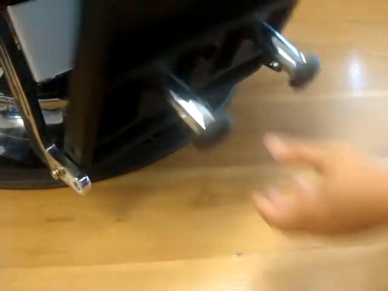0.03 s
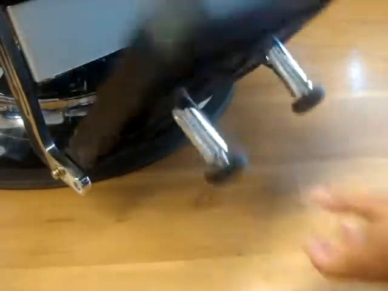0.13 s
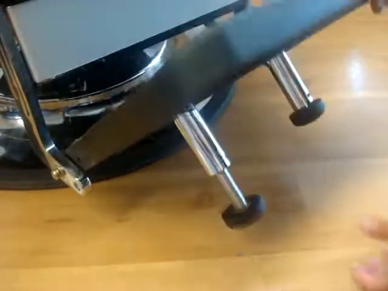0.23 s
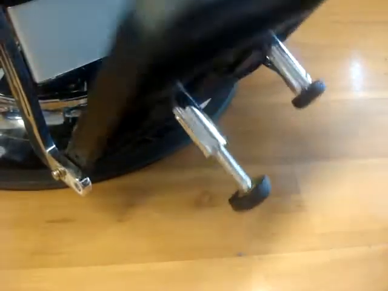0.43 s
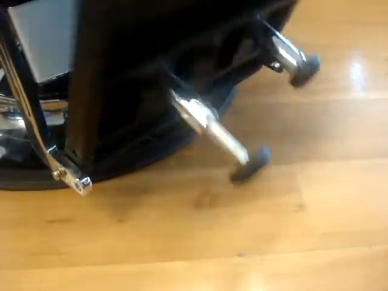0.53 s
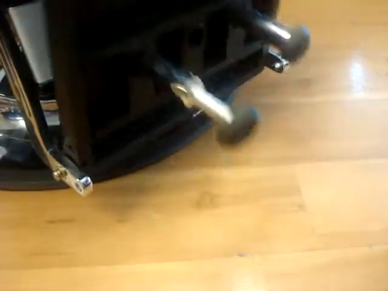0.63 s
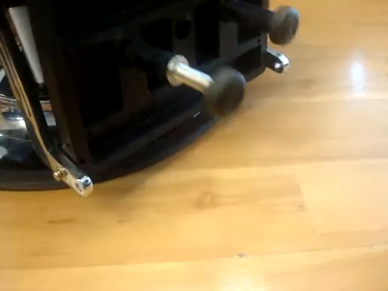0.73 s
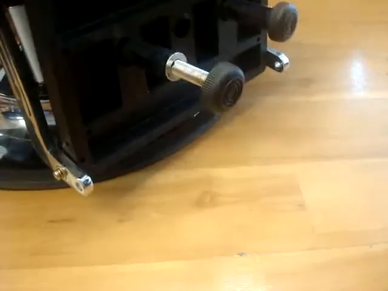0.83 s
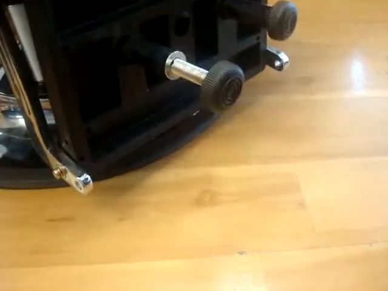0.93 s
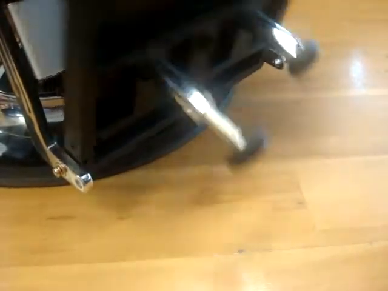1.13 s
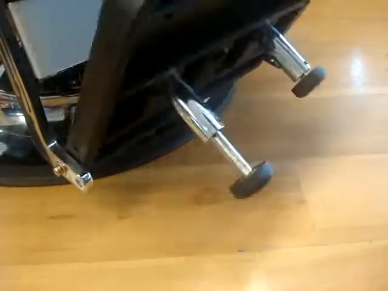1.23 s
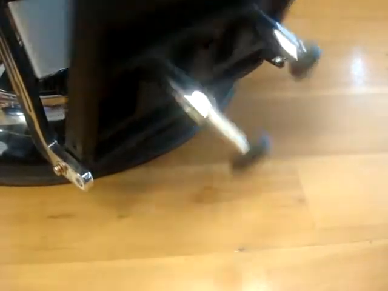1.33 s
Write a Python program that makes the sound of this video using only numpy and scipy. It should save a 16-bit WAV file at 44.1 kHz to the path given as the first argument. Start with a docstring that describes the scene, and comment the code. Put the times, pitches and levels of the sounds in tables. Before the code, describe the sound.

Loud clattering clank of a chair's metal footrest, followed by faint hinge knocks in a small room.

```python
"""A chair in a small room, on one microphone near enough to catch each contact ahead of the room.
Over a soft rush of air, the metal footrest is flipped: its hinge scrapes, and it chatters ever harder,
clanks against its stop with thuds through the chair's frame, and settles. A low hum swells and fades.
Then the loose hinge shifts with a few dull knocks, and two soft bumps follow as the footrest swings back."""
import sys
import numpy as np
from scipy import signal
from scipy.fft import rfft, irfft, next_fast_len
from scipy.io import wavfile

SR = 44100
rng = np.random.default_rng(int(sys.argv[2]) if len(sys.argv) > 2 else 0)


def output_pcm(signal):
    """Save a mono or channel-first signal as 16-bit PCM at the path in sys.argv[1].

    Samples are clipped to [-1, 1] before scaling.
    """
    pcm = np.clip(np.atleast_2d(signal).T, -1, 1) * 32767
    wavfile.write(sys.argv[1], SR, np.round(pcm).astype(np.int16))


N = 61739

# contacts of the chattering footrest: start_s, level_db, slope_db_per_octave
CONTACTS = [(0.1728, -33, -2.5), (0.186, -40.5, -3.5), (.200, -46, 8), (.215, -33, -0.5), (.228, -31.5, -4),
            (0.247, -27, 2.5), (0.2549, -25, 1), (.2625, -22.5, 2), (0.269, -19, 3.5), (0.2753, -22, 0.5),
            (0.286, -17.5, 2.5), (0.2902, -29, -5), (.2965, -18, -2), (0.3004, -22.5, -3.5),
            (.308, -26, -4.5), (.312, -12, 4), (.323, -20, 0.5), (.327, -20, 2), (.331, -12.5, 10),
            (0.3356, -15.5, 1.5), (0.346, -13.5, 8), (0.3526, -23, -4.5), (.358, -21, -11.5),
            (0.376, -20, 4), (0.3836, -23.5, -1.5), (.390, -26.5, 0.5), (.410, -34, 2)]
# colour of a contact on the plate: frequency_hz, level_db
PLATE_COLOUR = [(60, -47.5), (200, -29), (480, -15.5), (620, -5.5), (760, 2), (1200, -3.5), (1650, 3.5),
                (1980, -12.5), (2300, -0.5), (2700, -5.5), (2910, 2.5), (3100, -3), (4200, -3),
                (6000, -10.5), (7200, -17), (10000, -20.5)]
# modes of the steel frame: pitch_hz, level_db, t60_s
STEEL_MODES = [(710, -2, 0.1), (985, -3, 0.17), (1120, 1, 0.23), (1322, -3, 0.27), (1492, -9, 0.35),
               (1634, 2, 0.086), (2304, -5.5, 0.12), (2730, 0, 0.21), (2856, 8, 0.1), (2924, 8.5, 0.087),
               (3460, 1.5, 0.094), (4054, -7, 0.13), (4087, -2.5, .15), (5850, -32, 0.21),
               (6305, -26, 0.072)]
def footrest():
    """Each contact cracks, rattles the plate and rings the steel frame; harder ones reach higher."""
    out, t = np.zeros(N), np.arange(SR // 2) / SR
    edge_hz, edge_at_db, db_per_octave = 6750, -18.5, 20  # the treble edge climbs with the level
    rattle_db, leak_db, ring_db = -12.5, -19, -14
    rise = 1 - fade(t, t60_s=0.0037)  # the faces meet a little askew, so a crack builds up
    envelope = rise * (fade(t, t60_s=0.021) + amp(rattle_db) * fade(t, t60_s=0.059))
    for start_s, level_db, slope in CONTACTS:
        cutoff_hz = min(edge_hz * 2 ** ((level_db - edge_at_db) / db_per_octave), SR / 3)
        contact = burst(envelope, PLATE_COLOUR, slope)
        crack = signal.sosfilt(signal.butter(6, cutoff_hz, fs=SR, output="sos"), contact)
        steel = ring(t, STEEL_MODES, slope)
        add(out, start_s, amp(level_db) * (crack + amp(leak_db) * contact + amp(ring_db) * steel))
    return out


# the scrape as the footrest starts to turn: time_s, level_db
SCRAPE_LEVEL = [(.165, -54.5), (0.178, -42), (0.206, -40.5), (0.232, -31.5), (0.241, -45), (0.282, -34),
                (.31, -60)]
# colour of the scraping hinge: frequency_hz, level_db
SCRAPE_COLOUR = [(100, -31), (550, -16.5), (740, 3), (950, -3), (1150, 7), (1400, -2), (2000, -9),
                 (2900, -12.5), (5000, -22.5), (10000, -33.5)]
def hinge_scrape(slips_per_s=600):
    """The turning hinge moves in quick, irregular slips."""
    slips = (rng.random(N) < slips_per_s / SR) * rng.choice([-1, 1], N)
    level_db = np.interp(np.arange(N) / SR, *np.transpose(SCRAPE_LEVEL), left=-np.inf, right=-np.inf)
    return unit(coloured(slips, SCRAPE_COLOUR)) * amp(level_db)


# knocks of the loose hinge: start_s, level_db, slope_db_per_octave, focus_hz
HINGE_KNOCKS = [(0.8432, -39.5, -3.5, 2300), (.8470, -31, -0.5, 890), (.868, -41.5, 7, 1700),
                (0.9037, -34, 7, 2680), (.926, -39.5, 1, 2800), (0.9299, -33, 2.5, 805),
                (.9422, -34.5, 1.5, 1000), (.9535, -39.5, 1.5, 950), (1.0583, -32, -2.5, 1240),
                (1.075, -34.5, -2.5, 1270)]
# modes of the hinge bracket: pitch_hz, level_db, t60_s
BRACKET_MODES = [(598, -3, 0.019), (804, -3, 0.021), (1165, -0.5, 0.023), (1299, -1, .016),
                 (1695, -4, 0.023), (2175, -7.5, 0.018), (2630, -6, 0.011), (3170, -12, 0.011),
                 (4140, -18, .009)]
# colour of a knock's tick: frequency_hz, level_db
TICK_COLOUR = [(100, -58), (350, -11), (650, 0), (1300, 2.5), (3000, -1), (4600, -5.5), (6000, -23),
               (10000, -23)]
def hinge_knocks(tick_db=-4, ring_db=2.5, focus_db=8.5, focus_octaves=0.53):
    """Play in the hinge ticks and briefly rings the bracket; where a knock lands favours some modes."""
    out, t = np.zeros(N), np.arange(SR // 2) / SR
    for start_s, level_db, slope, focus_hz in HINGE_KNOCKS:
        modes = [(hz, db + focus_db * np.exp(-(np.log2(hz / focus_hz) / focus_octaves) ** 2), t60_s)
                 for hz, db, t60_s in BRACKET_MODES]
        tick = burst(fade(t, t60_s=0.0097), TICK_COLOUR, slope)
        bracket = ring(t, modes, slope)
        add(out, start_s, amp(level_db) * (amp(tick_db) * tick + amp(ring_db) * bracket))
    return out


# thuds as the footrest lands: start_s, level_db
LANDING_THUDS = [(.322, -34), (0.349, -37), (.383, -34), (.411, -42.5)]
# colour of the chair's frame: frequency_hz, level_db
FRAME_COLOUR = [(40, -27), (140, -25), (215, -4.5), (290, -8.5), (380, -3.5), (520, 7), (620, -9),
                (1500, -44.5)]
# bumps as the footrest swings back: start_s, level_db, pitch_hz
RETURN_BUMPS = [(1.1755, -36, 780), (1.187, -39.5, 712)]
def chair():
    """The landing thuds through the frame; later, soft bumps give one damped tone each."""
    out, t = np.zeros(N), np.arange(SR // 4) / SR
    for start_s, level_db in LANDING_THUDS:
        add(out, start_s, amp(level_db) * burst(fade(t, t60_s=0.066), FRAME_COLOUR, slope=0))
    bump_envelope = (1 - fade(t, t60_s=0.0052)) * fade(t, t60_s=0.031)
    for start_s, level_db, pitch_hz in RETURN_BUMPS:
        tone = np.sqrt(2) * np.sin(2 * np.pi * pitch_hz * t)
        add(out, start_s, amp(level_db) * tone * bump_envelope)
    return out


# decay of the small room: frequency_hz, t60_s
ROOM_DECAY = [(200, 0.53), (1000, 0.29), (3000, 0.4), (6000, 0.51), (9000, 0.81)]
# colour of the room at the microphone: frequency_hz, gain_db
ROOM_COLOUR = [(150, -8.5), (400, 4.5), (1200, -1), (3500, -11.5), (6000, -12.5), (9000, -19.5)]
def room(direct, wall_delay_s=0.006):
    """The walls' diffuse answer arrives just behind the direct sound; its midrange dies first."""
    hz, t, spectra = signal.stft(rng.standard_normal(SR * 3 // 4), SR, nperseg=256)
    decay = fade(t, along(ROOM_DECAY, hz)[:, None])
    tail = signal.istft(spectra * decay, SR, nperseg=256)[1]
    tail = np.pad(tail / np.linalg.norm(tail), (round(wall_delay_s * SR), 0))
    return coloured(signal.fftconvolve(direct, tail)[:N], ROOM_COLOUR)


# colour of the air in the room: frequency_hz, level_db
AIR_COLOUR = [(20, -28), (55, -22.5), (80, -14), (120, -3), (190, 0.5), (270, -3.5), (380, 2), (500, -2),
              (700, 2), (1100, -5), (2000, -8.5), (4000, -14), (7000, -18), (10000, -23)]
# course of the rush of air: time_s, level_db
AIR_LEVEL = [(0, -51), (.5, -50.5), (.8, -51), (1.12, -51), (1.22, -49), (1.31, -49), (1.4, -51.5)]
# course of the hum: time_s, level_db
HUM_LEVEL = [(0, -72.5), (.3, -66.5), (.5, -62.5), (.66, -60), (.77, -64), (.85, -86), (1.4, -69.5)]
def room_tone(hum_hz=92.5):
    """Behind the chair, a soft rush of air and a low hum that swells, fades and creeps back."""
    t = np.arange(N) / SR
    air = unit(coloured(rng.standard_normal(N), AIR_COLOUR))
    air *= amp(np.interp(t, *np.transpose(AIR_LEVEL)))
    hum = np.sqrt(2) * np.sin(2 * np.pi * hum_hz * t)
    hum *= amp(np.interp(t, *np.transpose(HUM_LEVEL)))
    return air + hum


def burst(envelope, colour, slope):
    """The noise of an impact, coloured and carrying the energy of its envelope."""
    n = len(envelope)
    hz = np.fft.rfftfreq(n, 1 / SR)
    cepstrum = irfft(np.log(amp(along(colour, hz)) * tilt(hz, slope)), n)
    cepstrum[1:n // 2] *= 2  # minimum phase: nothing sounds ahead of the impact
    cepstrum[n // 2 + 1:] = 0
    noise = envelope * rng.standard_normal(n)
    sound = irfft(rfft(noise) * np.exp(rfft(cepstrum)), n)
    return unit(sound) * np.sqrt(np.mean(envelope ** 2))


def ring(t, modes, slope, scatter_db=1.5, rise_s=0.0031):
    """Damped modes of alternating sign, struck a little differently each time."""
    hz, db, t60_s = np.transpose(modes)
    gains = amp(db + scatter_db * rng.standard_normal(len(hz))) * tilt(hz, slope)
    signs = (-1) ** np.arange(len(hz))
    swings = np.sin(2 * np.pi * hz[:, None] * t) * fade(t, t60_s[:, None])
    return unit(gains * signs) @ swings * np.sqrt(2 / len(hz)) * (1 - fade(t, rise_s))


def tilt(hz, slope):
    """Gain of a slope in dB per octave: hard contacts are bright, soft ones dull."""
    return amp(slope * np.log2(np.clip(hz, 500, 6000) / 2000))


def fade(t, t60_s):
    """Exponential decay by 60 dB in t60_s."""
    return np.exp(-np.log(1000) * t / t60_s)


def amp(db):
    """Decibels to gain."""
    return 10 ** (np.asarray(db) / 20)


def unit(x):
    """Scale to rms 1."""
    return x / np.sqrt(np.mean(x ** 2) + 1e-20)


def along(points, hz):
    """Rows of frequency_hz, value read on a log frequency axis."""
    frequencies, values = np.transpose(points)
    return np.interp(np.log(hz + 1), np.log(frequencies + 1), values)


def filtered(x, response):
    """Filter x by a gain that depends on frequency."""
    size = next_fast_len(N + SR // 2)
    return irfft(rfft(x, size) * response(np.fft.rfftfreq(size, 1 / SR)), size)[:N]


def coloured(x, colour):
    """Filter x by rows of frequency_hz, gain_db."""
    return filtered(x, lambda hz: amp(along(colour, hz)))


def add(track, start_s, sound):
    """Mix a sound in at start_s."""
    part = track[round(start_s * SR):][:len(sound)]
    part += sound[:len(part)]


def scene(knock_room_db=-3.5):
    """At the microphone: clatter and knocks, direct and off the walls, over the room tone."""
    clatter = footrest() + hinge_scrape()
    knocks = hinge_knocks() + chair()
    return (clatter + room(clatter) + knocks + amp(knock_room_db) * room(knocks) + room_tone())[None]


def record(dry, top_hz=10250):
    """The mono recorder keeps nothing above its band limit."""
    return filtered(dry[0], lambda hz: 1 / np.sqrt(1 + (hz / top_hz) ** 200))[None]


dry = scene()
out = record(dry)
output_pcm(out)
```